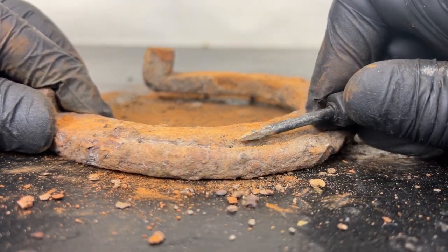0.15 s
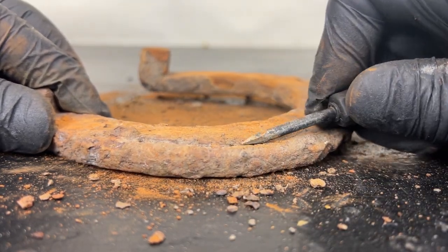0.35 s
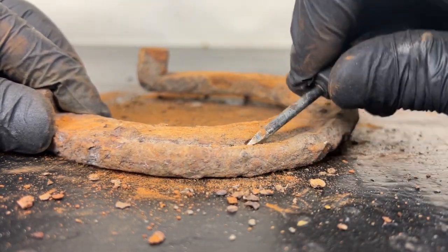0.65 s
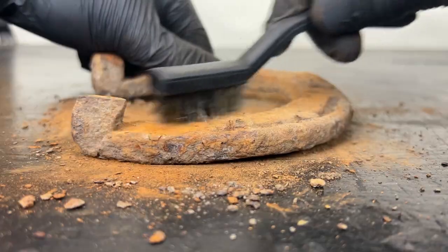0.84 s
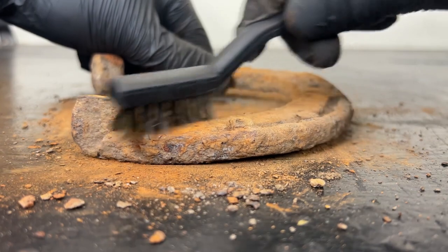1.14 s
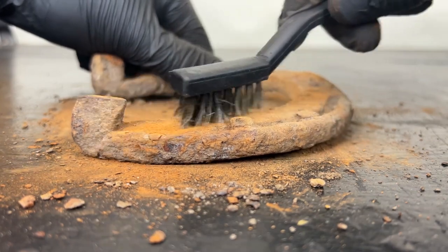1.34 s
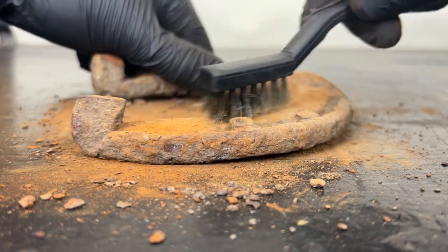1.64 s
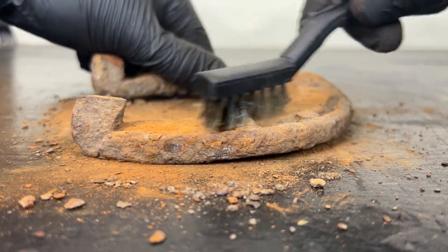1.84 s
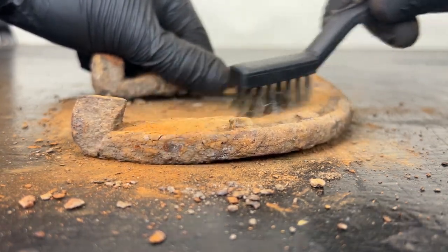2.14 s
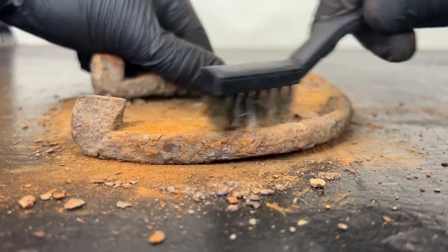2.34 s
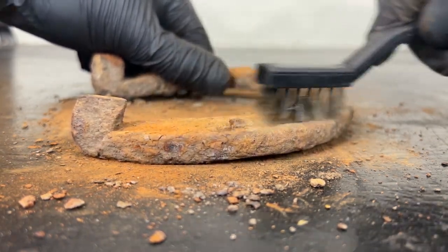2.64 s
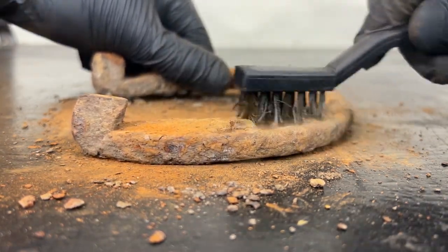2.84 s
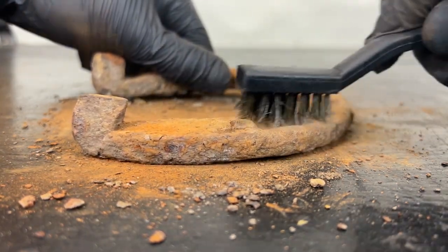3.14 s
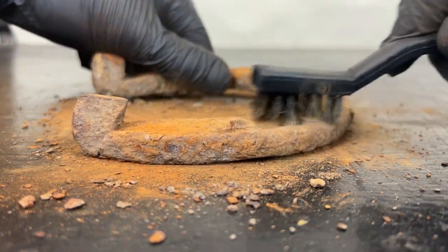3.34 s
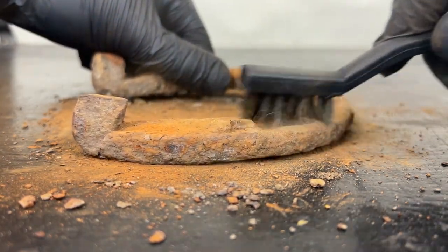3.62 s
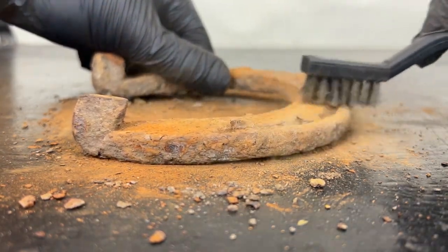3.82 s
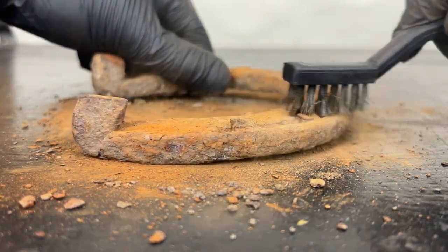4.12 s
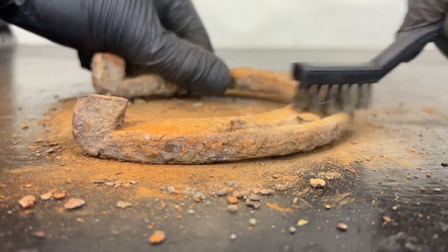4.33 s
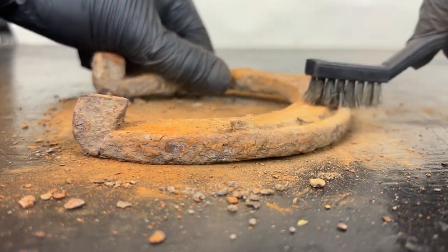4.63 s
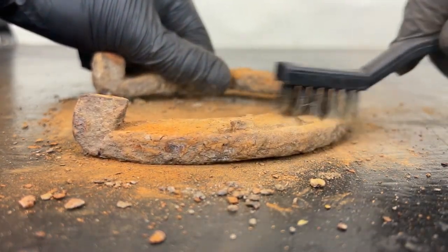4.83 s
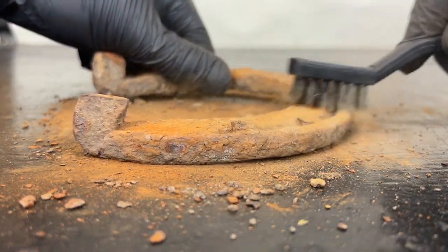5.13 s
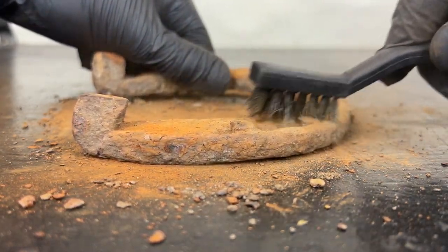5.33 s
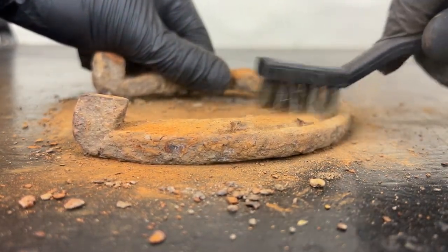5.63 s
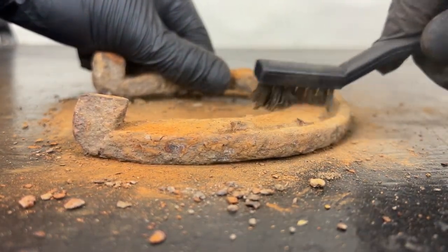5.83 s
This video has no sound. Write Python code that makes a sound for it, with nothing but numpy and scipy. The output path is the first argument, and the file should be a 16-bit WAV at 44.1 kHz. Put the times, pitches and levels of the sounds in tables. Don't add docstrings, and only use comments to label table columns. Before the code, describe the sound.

Brief gritty picking with sharp cracks, then quick rhythmic wire-brush scrubbing on a rusty horseshoe, with faint metallic ringing and soft bench thumps.

```python
import sys
import numpy as np
from scipy import signal
from scipy.fft import rfft, irfft, next_fast_len
from scipy.io import wavfile
from scipy.ndimage import uniform_filter1d

SR = 44100
rng = np.random.default_rng(int(sys.argv[2]) if len(sys.argv) > 2 else 0)


def natural_amplitude(level_db):
    exponent = np.asarray(level_db, float) / 20
    return 10 ** exponent


def dump_mix(stems):
    frames = np.atleast_2d(stems).T
    limited = np.clip(frames, -1, 1)
    pcm = np.round(limited * 32767).astype(np.int16)
    wavfile.write(sys.argv[1], SR, pcm)


N = 263277
TIME = np.arange(N) / SR
SIZE = next_fast_len(N + SR // 2)
HZ = np.arange(SIZE // 2 + 1) * SR / SIZE

# turn t/s, speed/dB, louder late than early/dB, bench weight/dB, iron ring/dB
DRAWS = [(0.734, -43, -5, -6, -10), (0.987, -44, 1, -4, -8.5), (1.236, -42.5, 4, -7, -4),
         (1.52, -42.5, -4, -8, -4.5), (1.806, -43, 1.5, -6, -15.5), (2.073, -42.5, -1.5, -4, -9),
         (2.336, -42.5, -1.5, -6, -12.5), (2.613, -42.5, 0, -4, -7), (2.894, -44.5, 5, -5.5, -11.5),
         (3.168, -42.5, -4, -6.5, -5.5), (3.445, -43.5, -5.5, -6.5, -2.5), (3.694, -43, -0.5, -1.5, -2),
         (4.005, -44, -1, -4, -8.5), (4.264, -43, -1.5, -2.5, -7.5), (4.535, -42.5, -0.5, -1, -7),
         (4.801, -42, -5.5, -9, -6.5), (5.072, -40, -1, -7, -12), (5.341, -42, -4, -10, -6.5),
         (5.624, -42, -3, -16.5, -7.5), (5.884, -42, -3.5, -14, -14)]
SHOVES = [(0.826, -40.5, -3, -3, -14), (1.107, -39, 1, -3, -13), (1.384, -44, -8.5, -1, -6.5),
          (1.658, -44, -10.5, -2, -2.5), (1.925, -43.5, -7.5, 1, -6), (2.195, -41.5, -3, -2, -11),
          (2.489, -44.5, 0.5, 0, -4), (2.756, -42, 1, -4, -1.5), (3.031, -44.5, 2.5, 1, 0.5),
          (3.293, -43, -2.5, -0.5, 1.5), (3.577, -43, 7.5, -3, -4.5), (3.836, -41, 4.5, -6.5, -4),
          (4.154, -43, 2, -3, -8), (4.41, -41.5, 0, -1, -6.5), (4.671, -42, 6.5, -7, -7.5),
          (4.933, -42.5, 2, -3.5, -5), (5.215, -41.5, 5.5, -6.5, -10), (5.489, -41.5, 3, -9.5, -14),
          (5.754, -42, -1.5, -17.5, -11)]
# thin ring/dB, heave/dB, deep heave/dB
MEETS = [(8, 2.5, -13), (4, 2.5, -9), (3, 3.5, -5), (-4, 1, -5), (7, 1, -10), (5, 1, -4), (-15, 3, -12),
         (6, -2.5, -6), (-6, 1.5, -13), (7.5, -1, -2), (2, 3.5, -7), (4, 4.5, 0), (-9, -4, 11.5),
         (3, -1.5, -6), (-14, 6, -1), (-10, -3.5, -2.5), (-1, 7.5, -4), (10, 2.5, 6), (-3, 3, -7),
         (5, 2.5, -16), (9, 7, 0), (-8, -6.5, -4.5), (7, 7, -6), (-2, 0, -7), (9, -1, 0), (-11, -3, -1),
         (-17, -1, -9), (-21, -2, 6), (6.5, 1, 2.5), (7.5, 3.5, -3), (4, -5.5, -1.5), (7.5, 2.5, 1),
         (3, -9, 1.5), (1, 1, -6), (5, -3.5, 7.5), (13.5, 3.5, -13), (-14, 4.5, 0), (10.5, 0, -4),
         (6.5, -2, 1)]
# low pair/dB, middle/dB, top/dB
GRIPS = [(-1, -0.5, -0.5), (-1, 3.5, -6), (1, 0.5, -3), (1.5, -1.5, -5), (1, -2.5, 1.5), (-1, -1, -2.5),
         (2.5, 1, -0.5), (2, 2.5, -1), (-1, 4.5, 1.5), (-3, -2.5, -2.5), (-1, 1, -0.5), (-2.5, -0.5, -5),
         (3, 2.5, 5.5), (-1, -3, -0.5), (-0.5, -3, 1), (1, 0, 5.5), (0.5, -7.5, 1), (2.5, 3, -1.5),
         (-4, -0.5, 0.5), (-1.5, -0.5, 3), (1.5, 6.5, 3), (5.5, 0, -3), (-2.5, -9, 1.5), (6, -1, -0.5),
         (0.5, -1.5, -5), (0.5, 0.5, -1), (-1, -3.5, -5.5), (-4, -7, -2.5), (-4, -5, 5), (3, 6.5, -5.5),
         (1, 4.5, 9.5), (3, -1.5, -3.0), (-1.5, 0.5, -1.5), (3.5, -3, -0.5), (3.5, -1.5, 0.5), (-3, 4, -1),
         (3, 3, 4), (0, -3, -3), (-1, 3, 5)]
# t/s, level at the turn/dB
HURRY = [
    (.8, -54.5),
    (2.1, -57.5),
    (4.4, -53),
    (5.9, -48.5),
]
STOPS = [0, 0, 0, -2, -3, 0, -2, 0, 0, -3, 0, -2, 3, -2, 2, 0, -6, 0, 0, -2, -2, 5, 0.5, -0.5, -0.5, 1, -3,
         -1.5, 0, -0.5, 1.5, -3, 2, -3.5, -4, -3.5, 0.5, 0.5, 1.5]


def strokes():
    up_to_speed, brakes = 0.31, 0.7
    landing_s, last_stroke_s = 0.01, 0.19
    thin_db, heave_db, deep_db = np.transpose(MEETS)
    rows = np.array(sorted([(*row, False) for row in DRAWS] + [(*row, True) for row in SHOVES]))
    turn, db, lean_db, bench_db, low_db, away = rows.T
    length = np.diff(turn, append=turn[-1] + last_stroke_s)
    rise = up_to_speed * length
    turn_db = np.interp(turn, *np.transpose(HURRY)) + STOPS
    rise[0], turn_db[0] = landing_s, -82
    s = np.column_stack([turn, turn + rise, turn + brakes * length]).ravel()
    levels = np.column_stack([turn_db, db - lean_db / 2, db + lean_db / 2]).ravel()
    speed_db = np.interp(TIME, s, levels, left=-120)
    scratch_db = np.where(away, -7, -9.5)
    high_db = np.where(away, -6, -5)
    thud_db = np.where(away, -8.5, -15.5) + heave_db + 1.52 * turn
    shaken = np.column_stack([turn + length / 2, scratch_db, low_db, high_db, bench_db,
                              thud_db, thin_db, deep_db - heave_db, GRIPS])
    return speed_db, curves(shaken)


# t/s, peak/dB, fade/s, bench share/dB, scrape share/dB
CATCHES = [(0.7444, -40, 0.014, 5, 5), (0.852, -34.5, 0.013, -11, 5), (1.1366, -40, 0.0086, -16, -2),
           (1.3, -32.5, 0.0089, -1, 9), (1.421, -33, 0.0087, -15, 0), (1.544, -47, 0.0088, 9, 2),
           (1.6859, -33, 0.0086, -3.5, 11), (2.1, -41, 0.012, 8.5, 1.5), (2.511, -37, 0.0056, -1, -6),
           (2.7914, -39, 0.018, -6, -6), (2.918, -39, 0.003, 3, 17.5), (2.9386, -31, 0.0071, 3, 8),
           (3.028, -45.5, 0.012, 5, 26), (3.217, -27.5, 0.025, -7, 0), (3.372, -31, 0.038, -34, -18),
           (3.4808, -25, 0.0063, -11, -15), (3.7087, -20, 0.003, -16, -14), (3.7506, -24, 0.0083, -14, -10),
           (3.868, -32.5, 0.0088, -4.5, -5), (4.036, -32, 0.0086, -2, -8), (4.1874, -32.5, 0.0082, 3, 5),
           (4.577, -45.5, 0.016, 11.5, -3), (4.689, -35, 0.0095, -12, -2), (4.776, -35, 0.0079, 6.5, -6),
           (4.841, -26, 0.0028, 9, -5), (5.113, -37.5, 0.0076, 11.5, -2), (5.227, -33, 0.051, -27, -4),
           (5.764, -41, 0.0074, -14, -1), (5.891, -31.5, 0.0046, 8.5, 21.5)]


def catch_tufts(wires, drag, speed):
    hold, hold_s, before = 0.8, 0.014, 1500
    held = 1 - hold * np.exp(-TIME[before:0:-1] / hold_s)
    flakes = np.zeros(N)
    for at, db, fade, bench_share_db, scrape_share_db in CATCHES:
        i = int(at * SR)
        wires[:, i - before:i] *= held
        drag[:, i - before:i] *= np.sqrt(held)
        speed[i - before:i] *= held
        add(wires, at, db - 12, fade, .0003)
        add(drag, at, db + bench_share_db, fade, .0005)
        add(flakes, at, db + scrape_share_db - 31, fade, .0003)
    return flakes


# t/s, rim/dB, far end/dB, high ring/dB
PLACE = [
    (0.74, -64, -54, 1.5),
    (1.2, -59, -50, 2.5),
    (1.88, -59.5, -56, -4),
    (2.7, -48.5, -62.5, -1),
    (3.5, -49.5, -60, 4),
    (5.0, -50.5, -64.5, -3.5),
    (5.79, -44, -51.5, 5),
    (5.97, -41.5, -50, -8),
]
# f/Hz, level/dB per Hz
HISS = [(5000, -29.5), (7000, -0.5), (8000, 4), (9000, 9), (12000, 10), (14000, 3.5), (15000, 12.5),
        (15700, -1)]
# f/Hz, level/dB per Hz
SCRATCH = [(500, -4.5), (1000, -10.5), (2000, -1), (3000, -1), (5000, 3.5), (7000, 2), (8000, -18),
           (10000, -12)]
# f/Hz, t60/s, level/dB, left minus right/dB, right leads/rad
THIN = [(8651, .055, 0, 0, 0), (8700, .03, -5, 0, 0)]


def brush(low, high, bench, rim, far_end, thud):
    speed_db, shaken = strokes()
    scratch_db, low_db, high_db, bench_db, thud_db, thin_db, deep_db, *grips = shaken
    speed = natural_amplitude(uniform_filter1d(speed_db, size=200) + 0.6 * flutter(68))
    rim_db, far_db, near_db = curves(PLACE)
    wires = speed * ticks(16000, 1.8, 0.45)
    drag = speed * natural_amplitude(1.5 * flutter(27)) * ticks(4000, 1.85, 0.8)
    flakes = catch_tufts(wires, drag, speed)

    hiss = natural_amplitude(1.5) * through(wires, colour(HISS))
    late = np.interp(np.arange(N) + 1.5 * flutter(12.6) + 1, np.arange(N), wires[1])
    late = natural_amplitude(-2.5) * (.7 * late + .7 * np.roll(late, 97))
    scraping = np.array([wires[0], late]) * natural_amplitude(scratch_db + 2.5 + 1.5 * flutter(30))
    patches = zones(colour(SCRATCH), [1200, 2200, 3300, 4500, 5800, 7200])
    scratch = patchy(scraping, patches, 2.5, 22)

    inner = speed * natural_amplitude(2.2 * flutter(30)) * ticks(16000, 1.9, .85)
    coarse_flakes = through(inner * natural_amplitude(scratch_db - 14 + 3 * flutter(45)), colour(GRIND))
    bend = modes([(hz, *row) for hz, row in zip(IRON_HZ, IRON_LOW[:2])])
    iron = patchy(inner * natural_amplitude(low_db - 0.8 + 1.1 * flutter(26)), low, 1.74, 12)
    iron += through(inner * natural_amplitude(scratch_db - 21), bend)
    iron += through(wires * natural_amplitude(high_db + near_db - 2.0 + 1.36 * flutter(38)), high)
    iron += through(wires[::-1] * natural_amplitude(high_db + thin_db - 7 + 1.4 * flutter(30)), modes(THIN))

    push = drag * natural_amplitude(bench_db + 0.037 * np.maximum(speed_db + 44.5, -20))
    shaking = patchy(push * natural_amplitude(-.5), bench, 2.2, 22.6, grips[:1] + grips)
    shaking += through(push * natural_amplitude(rim_db + 43.0), rim)
    shaking += through(push * natural_amplitude(far_db + 45.0), far_end)
    heave, deep = (speed * natural_amplitude(thud_db + db + 2.9 * flutter(103)) * rng.standard_normal(N)
                   for db in (-2.5, deep_db - 4.5))
    shaking += through(heave, modes(THUD[1:])) + through(deep, modes(THUD[:1]))

    sprung = speed * natural_amplitude(scratch_db - 17) * ticks(250, 2.5, .8)
    twang = through(sprung, colour(CRACK) + colour(SCRATCH))
    torn = through(flakes, colour(GRIND) + natural_amplitude(-26) * bend)
    return hiss + scratch + coarse_flakes + iron + shaking + twang + torn


# t/s, level/dB, dust/dB, groove ring/dB
CREEP = [(0.0, -76, -75, -39), (.06, -71, -78, -20), (.1, -61, -78, -11), (.14, -79, -85, -24),
         (.21, -71, -81, 2), (.29, -66.5, -77, -4), (.35, -65, -67, -3), (.39, -65, -64, -10),
         (.44, -58.5, -75, -16), (.52, -77, -71, -17.5), (.565, -66.5, -72, -18), (.6, -70.5, -87, -23.5),
         (.665, -73, -74, -4), (.69, -73.5, -80, -17), (.74, -71.5, -78.5, -26)]
# f/Hz, level/dB per Hz
GRIND = [(500, -37), (1200, -2.5), (2400, -7.5), (4000, -9), (6000, -38), (12000, -25.5)]
# t/s, peak/dB, f/Hz, t60/s
SHIFTS = [
    (.021, -51, 1710, 0.017),
    (0.023, -55, 1320, .02),
    (.033, -55, 1370, 0.07),
    (.05, -54, 2400, .01),
    (.242, -47.5, 1100, 0.053),
    (0.241, -43, 2370, 0.015),
    (0.244, -48, 1380, 0.022),
    (.265, -45, 1270, .025),
    (.265, -47.5, 480, 0.037),
]
# t/s, peak/dB, f/Hz, t60/s
POPS = [
    (.0722, -33, 1900, .008),
    (.3592, -15, 2300, .005),
    (.3594, -19, 1850, .012),
    (.3608, -25, 2700, .012),
    (.4217, -35, 1900, .008),
    (.4241, -6, 2300, .005),
    (.4244, -20, 1850, .012),
]
# t/s, peak/dB, f/Hz, t60/s
FLAKES = [
    (.0722, -36, 4000, .006),
    (.3592, -24, 3500, .008),
    (.3594, -29, 4500, .006),
    (.3593, -32, 7000, .006),
    (.4238, -19, 3600, .006),
    (.4239, -14, 4600, .005),
    (.4238, -11, 5400, .005),
    (.4237, -9, 6700, .004),
]
# t/s, low whistle/dB, high whistle/dB
WHISTLE = [
    (.16, -90, -95),
    (.2, -78, -93),
    (.26, -75, -90),
    (.33, -75, -72),
    (.357, -74, -74),
    (.37, -100, -100),
]


def creeping_pick(low, bench, far_end, thud):
    scrape_db, dust_db, groove_db = curves(CREEP + [(.75, -110, -110, -20)])
    harder_db = 2.1 * (scrape_db + 65)
    grit = ticks(9000, 1.9, .5)
    fizz = ticks(12000, 1.6, .4)
    out = through(grit * natural_amplitude(scrape_db), colour(GRIND) + natural_amplitude(-16) * low) + shank(SHIFTS + POPS)
    pan_db, lead = 5, -1.7
    out += shank(FLAKES) * np.array([[natural_amplitude(pan_db / 2)], [natural_amplitude(-pan_db / 2) * np.exp(1j * lead)]])
    out += through(grit * natural_amplitude(scrape_db + groove_db), modes([(2370, .05, 0, 2.2, 0.0047)]))
    for db, hz in zip(curves(WHISTLE), (6400, 7300)):
        out += through(fizz * natural_amplitude(db), modes([(hz, .003, 0, 1, 0)]))
    out += through(grit * natural_amplitude(harder_db - 62), bench + natural_amplitude(-7.5) * far_end)
    out += through(grit[0] * natural_amplitude(harder_db - 59), thud)
    return out, fizz, natural_amplitude(dust_db)


# t/s, peak/dB, brightness/dB, bench/dB, crack/s
SNAPS = [(0.0716, -22, -20.5, -15, 0.0026), (0.164, -62, -1, -26, .003), (0.183, -63, -5, -26, 0.0022),
         (0.2403, -46, -26, 0, 0.0016), (0.3579, -18.5, -15, -1.5, 0.0031), (0.4207, -41, -8, -26, 0.0028),
         (0.4232, -9.5, -7, -7, 0.0017), (0.543, -29.5, -7.5, -29, 0.00049), (0.559, -46.5, 8, -18, 0.003),
         (0.572, -43.5, 4.5, -24, 0.0026), (0.6336, -54, -1, -26, 0.0024), (0.65, -52, -13, -26, 0.0026),
         (.664, -50.5, -14, -26, 0.0049), (.674, -53, -14, -28, 0.0027), (0.7325, -47.5, -1, -1, 0.0012)]
# f/Hz, level/dB per Hz
CRACK = [(500, -24), (1650, 3), (1950, 3.5), (2700, 7), (3500, -2), (5000, -3), (6500, -19.5), (12000, -15)]
# f/Hz, level/dB per Hz
SIZZLE = [(2500, -2), (5000, 4), (7000, 5.5), (9000, -8), (12000, -5), (15000, -9.5)]
# f/Hz, level/dB, t60/s
STRUCK = [(2570, -14, .03), (4300, -12, .04), (5185, -10, .1), (5495, -11, .06), (6195, -1, .11),
          (6375, -4, .04), (6490, -7, .04), (6800, -7, .02), (8235, -12, .07), (8695, -10, .08),
          (10780, -12, .08), (11965, -6, .1), (12500, -11, .09), (15450, -11, .09)]


def pick(low, high, bench, rim, far_end, thud):
    out, fizz, dust = creeping_pick(low, bench, far_end, thud)
    dull, bright, ring, knock = np.zeros((4, N))
    for at, db, bright_db, knock_db, crack in SNAPS:
        i = int((at + .001) * SR)
        dimmed_db = min(bright_db, 0)
        knock[i] += natural_amplitude(db + knock_db + 6.5)
        add(dull, at, db - 7, crack, .0004)
        add(bright, at, db + bright_db + 3.5, crack, .0004)
        ring[i] += natural_amplitude(25 + 1.54 * db + 0.74 * dimmed_db)
        trickle_db = db + dimmed_db - 21.5 - 299 * np.abs(TIME - at)
        dust = dust + (TIME > at) * natural_amplitude(trickle_db)
    pan_db, lead_s = .5, -.00004
    ports = np.array([natural_amplitude(pan_db / 2) + 0 * HZ, natural_amplitude(-pan_db / 2) * np.exp(2j * np.pi * HZ * lead_s)])
    struck = modes([(hz, t60, db, 1.5, k) for k, (hz, db, t60) in enumerate(STRUCK)])
    out += through(fizz * dust, colour(SIZZLE))
    out += through(dull, colour(CRACK) * ports) + through(bright, colour(HISS))
    return out + through(ring, struck) + through(knock, rim + natural_amplitude(-3.0) * bench)


def shank(rows):
    out, age = np.zeros(N), TIME[:8000]
    for at, db, hz, t60 in rows:
        i = int(at * SR)
        envelope = natural_amplitude(db - 60 * age / t60) * (1 - np.exp(-age / 0.00045))
        out[i:i + 8000] += envelope * np.sin(2 * np.pi * hz * age)
    return rfft(out, SIZE)


# t/s, peak/dB, push/s
ROCKS = [(0.024, -40, 0.0049), (0.074, -30.5, 0.001), (0.089, -20, 0.0031), (0.439, -27.5, 0.0048),
         (0.723, -41.5, 0.0015), (0.926, -29.5, 0.0011), (1.049, -39, 0.0048), (2.105, -34.5, 0.0024),
         (2.39, -36, 0.0049), (2.949, -35, 0.0063), (3.38, -27.5, 0.0014), (3.635, -31.5, 0.0012),
         (3.961, -25, 0.0016), (4.203, -27, 0.0049), (4.453, -32.5, 0.003), (5.101, -35, 0.0028),
         (4.723, -48, 0.006), (4.987, -35, 0.0032), (5.549, -24, 0.0034), (5.76, -27, 0.0027)]


def rocking(thud):
    line, age = np.zeros(N), TIME[:2000] - TIME[1000]
    for at, db, push in ROCKS:
        i = int(at * SR) - 1000
        line[i:i + 2000] += natural_amplitude(db - 19.0) * np.exp(-((age - push) / max(push, 1e-3)) ** 2)
    return through(line, thud)


IRON_HZ = [1873, 2390, 3623, 4323, 5215, 5590, 6148, 6220, 8253, 8345, 8651, 11960, 12500, 15430]
# t60/s, level/dB, left minus right/dB, right leads/rad
IRON_LOW = [(.04, -12, 4, 2.), (.045, -17, 6, -.2), (.05, -18, 4, -1.6), (.04, -17, 3, -.3),
            (.045, -14, 2, -2.), (.045, -15, 5, -1.), (.065, 0, 4, .1), (.02, -7, 4, 0.)]
# t60/s, level/dB
IRON_HIGH = [(.11, 0), (.07, 0), (.09, -9), (.05, -11), (.06, -8), (.03, -13)]
# f/Hz, t60/s, level/dB, left minus right/dB, right leads/rad
BENCH = [(299, 0.084, 5, -0.5, 0.1), (388, 0.09, 3.5, 2.5, 0.57), (452.2, 0.1, 9, -2, 0.45),
         (549.8, 0.12, 8, 4, -1.55)]
RIM = [(657, 0.075, 2.1, 4.4, 0.31), (729.2, 0.13, 7.7, 8.5, 0.59)]
FAR_END = [(846, 0.065, 11.5, 0.25, 0.25), (964, 0.17, 6, 0.73, 1), (1127, 0.028, 5.5, 0.48, 0.82),
           (1220, 0.029, -2, 0.7, 1)]
THUD = [(74.5, 0.19, -6.5, 0.0033, 0.086), (115, 0.025, -0.5, 0.0094, 0.26),
        (141.2, 0.13, 4, 0.008, -0.017), (229.5, 0.056, -1.5, 0.0028, -0.41)]


def bodies():
    low = [(hz, *row) for hz, row in zip(IRON_HZ, IRON_LOW)]
    high = [(hz, *row, 0, 0) for hz, row in zip(IRON_HZ[len(low):], IRON_HIGH)]
    return modes(low, True), modes(high), modes(BENCH, True), modes(RIM), modes(FAR_END), modes(THUD)


def workshop_echo():
    tail = rng.standard_normal((2, SR // 2)) * natural_amplitude(-60 * TIME[:SR // 2] / .17)
    return natural_amplitude(-17) * unit_gain(rfft(tail, SIZE)) * HZ / np.hypot(HZ, 500)


# f/Hz, level/dB per Hz
AIR = [(18, -34), (30, 9), (245, 7), (988, -22), (1070, -37), (1190, -39), (16000, -63)]


def room_air():
    return natural_amplitude(-64) * through(ticks(SR, 0, 0.92), colour(AIR))


def ticks(rate, spread_db, alike):
    size = natural_amplitude(spread_db * rng.exponential(size=(2, N))) * rng.standard_normal((2, N))
    first, second = size * (rng.random((2, N)) < rate / SR)
    alike = np.clip(alike, 0, 1)
    return unit(np.array([first, alike * first + np.sqrt(1 - alike ** 2) * second]))


def flutter(rate):
    k = int(SR / rate)
    return unit(uniform_filter1d(uniform_filter1d(rng.standard_normal(N), k), k))


def add(line, at, db, fade, rise):
    i = int(at * SR)
    age = TIME[:min(3000, N - i)]
    shape = (1 - np.exp(-age / rise)) * np.exp(-age / max(fade, 1e-4))
    line[..., i:i + 3000] += natural_amplitude(db) * shape * rng.standard_normal(3000)[:len(age)]


def modes(table, apart=False):
    gain = np.zeros((len(table), 2, len(HZ)), complex)
    for k, (hz, t60, db, pan_db, lead) in enumerate(table):
        decay = np.log(1000) / t60
        ring = (-1) ** k * natural_amplitude(db) * np.sqrt(decay) / (decay + 2j * np.pi * (HZ - hz))
        ring *= 2 * HZ * hz / (HZ ** 2 + hz ** 2)
        gain[k] = ring * np.array([[natural_amplitude(pan_db / 2)], [natural_amplitude(-pan_db / 2) * np.exp(1j * lead)]])
    whole = gain.sum(axis=0)
    return gain / np.sqrt(np.mean(np.abs(whole) ** 2)) if apart else unit_gain(whole)


def patchy(x, gains, depth_db, rate, lean_db=None):
    lean_db = [0] * len(gains) if lean_db is None else lean_db
    return sum(through(x * natural_amplitude(db + depth_db * flutter(rate)), gain) for gain, db in zip(gains, lean_db))


def zones(gain, centres_hz):
    return [gain * np.interp(HZ, centres_hz, one) for one in np.eye(len(centres_hz))]


def colour(points):
    hz, db = np.transpose(points)
    cepstrum = irfft(np.log(natural_amplitude(np.interp(np.log(HZ + 1), np.log(hz), db))), SIZE)
    cepstrum[1:SIZE // 2] *= 2
    cepstrum[SIZE // 2 + 1:] = 0
    return unit_gain(np.exp(rfft(cepstrum)))


def unit(x):
    return x / np.sqrt(np.mean(x ** 2))


def unit_gain(gain):
    return gain / np.sqrt(np.mean(np.abs(gain) ** 2))


def curves(table):
    s, *columns = np.transpose(table)
    return [np.interp(TIME, s, c) for c in columns]


def through(x, gain):
    return rfft(x, SIZE) * gain


def sound(spectrum):
    return irfft(spectrum, SIZE)[..., :N]


def scene():
    low, high, bench, *rest = parts = bodies()
    near = brush(*parts)
    near += pick(low.sum(axis=0), high, bench.sum(axis=0), *rest)
    near += rocking(parts[-1])
    return sound(near * (1 + workshop_echo()) + room_air())


def two_ports(dry):
    one_port_hz, in_phase_hz, turn_hz = 7800, 8420, 3560
    share = 1 / (1 + np.exp((one_port_hz - HZ) / 250))
    turning = np.exp(2j * np.pi * (HZ - in_phase_hz) / turn_hz)
    shifted = through(dry[0], np.sqrt(share) * turning)
    right = sound(through(dry[1], natural_amplitude(-0.65) * np.sqrt(1 - share)) + shifted)
    return np.array([dry[0], right])


def drop_masked(left, right):
    below_db, quiet_db, fill, blow_db, top_hz = -12, -127, .25, -65, 15750
    hz, _, both = signal.stft(np.array([left + right, left - right]) / 2, SR, "cosine", nperseg=2048)
    hz, both = hz[:-1, None], both[:, :1024]
    power = np.abs(both) ** 2
    narrow, wide = (np.repeat(power.reshape(2, 1024 // k, k, -1).mean(axis=2), k, axis=1) for k in (8, 16))
    band = np.where(hz < 8200, narrow, wide)
    mask = np.exp(uniform_filter1d(np.log(band.sum(axis=0) + 1e-30), size=120, axis=0))
    bump_db = 6 * np.exp(-((hz - 3400) / 1600) ** 2) + 4.5 * np.exp(-((hz - 7300) / 1500) ** 2)
    mask *= natural_amplitude(below_db + bump_db) ** 2
    mask += natural_amplitude(quiet_db + 5 * (hz / 7000) ** 2) ** 2
    blow = power[0].mean(axis=0) > natural_amplitude(blow_db) ** 2
    treble = power[0, 400:700].mean(axis=0)
    steady = (treble < 16 * np.roll(treble, 2)) & ~blow
    share = fill * (hz > 8800) * steady
    noise = np.sqrt(band) * np.exp(2j * np.pi * rng.random(band.shape))
    both = np.sqrt(1 - share) * both + np.sqrt(share) * noise
    heard = (band > mask * np.where(steady, 1, .1)) | (hz < 1800)
    both *= heard & (hz < top_hz) | blow
    both = np.pad(both, ((0, 0), (0, 1), (0, 0)))
    mid, side = signal.istft(both, SR, "cosine", nperseg=2048)[1][:, :len(left)]
    return np.array([mid + side, mid - side])


# f/Hz, level over step/dB
STEPS = [(700, 22), (1400, 12), (2100, 5), (3000, 0), (5500, 1.5), (7500, 1), (8800, 10)]


def coarse(x):
    frame, width = 1024, 16
    bell = np.cumsum(np.kaiser(frame + 1, 4 * np.pi))
    half = np.sqrt(bell[:-1] / bell[-1])
    phase = np.outer(np.arange(2 * frame) + (1 + frame) / 2, np.arange(frame) + .5)
    waves = np.r_[half, half[::-1]][:, None] * np.cos(np.pi / frame * phase)
    both = np.pad([x[0] + x[1], x[0] - x[1]], ((0, 0), (frame, 2 * frame - x.shape[1] % frame)))
    both = both.reshape(2, -1, frame)
    lines = np.concatenate([both[:, :-1], both[:, 1:]], axis=2) @ waves
    power = (lines ** 2).mean(axis=0).reshape(-1, frame // width, width).mean(axis=2) + 1e-20
    centre_hz = (np.arange(frame // width) + .5) * width * SR / 2 / frame
    over_db = np.interp(centre_hz, *np.transpose(STEPS))
    step = np.sqrt(uniform_filter1d(power, size=3)) * natural_amplitude(2 * rng.standard_normal(power.shape) - over_db)
    treble = power[:, 4:].sum(axis=1)
    sudden = treble > 8 * np.roll(treble, 2)
    step = np.repeat(step * np.where(sudden, .01, 1)[:, None], width, axis=1)
    rungs = np.floor(np.abs(lines / step) ** .75 + .4054) ** (4 / 3)
    frames = (np.sign(lines) * step * rungs) @ waves.T / frame
    joined = frames[:, 1:, :frame] + frames[:, :-1, frame:]
    mid, side = joined.reshape(2, -1)[:, :x.shape[1]]
    return np.array([mid + side, mid - side])


def low_pass(x):
    return signal.sosfilt(signal.butter(12, 17130, fs=SR, output="sos"), x)


def record(dry):
    lag = 680
    heard = np.pad(two_ports(dry), ((0, 0), (lag, 0)))
    mix = coarse(drop_masked(*heard))[:, lag:]
    return low_pass(mix)


dry = scene()
out = record(dry)
dump_mix(out)
```